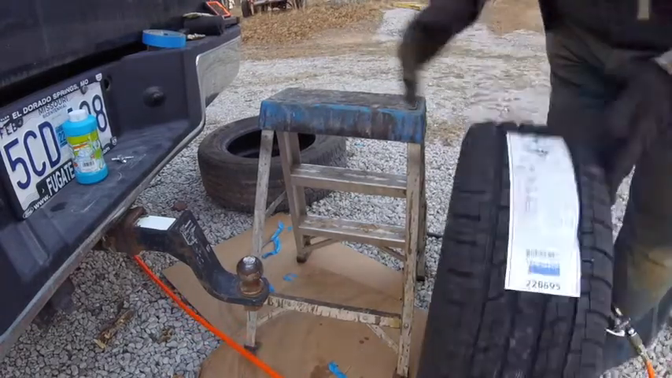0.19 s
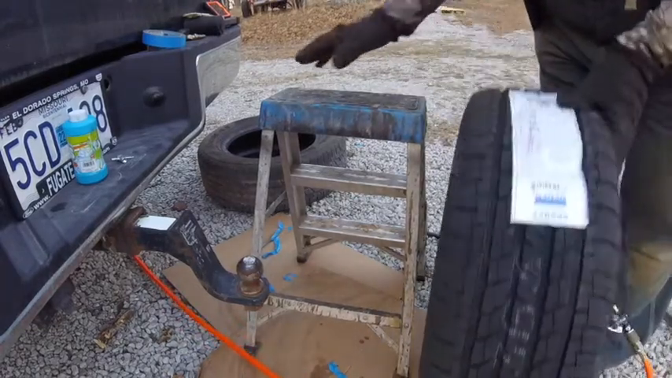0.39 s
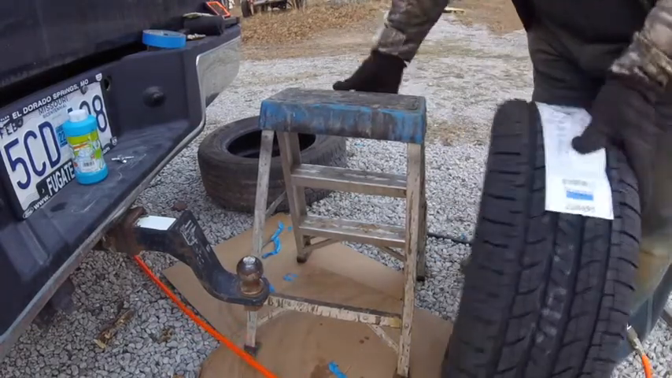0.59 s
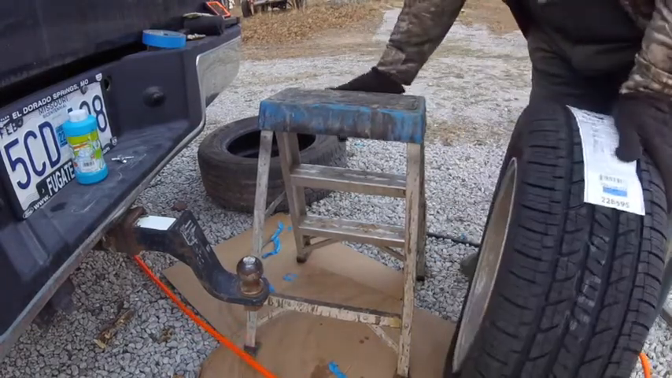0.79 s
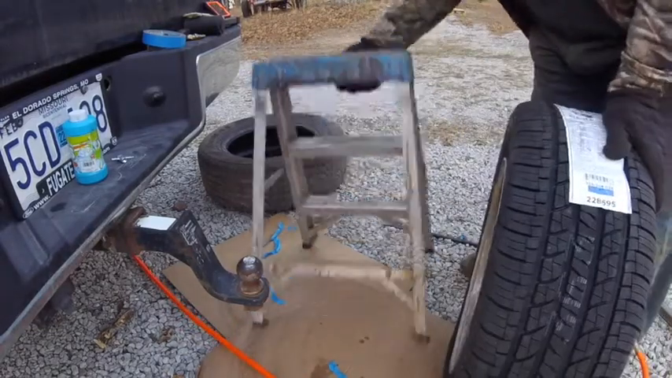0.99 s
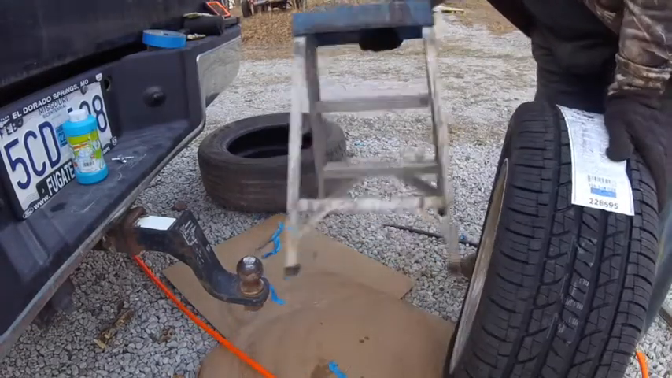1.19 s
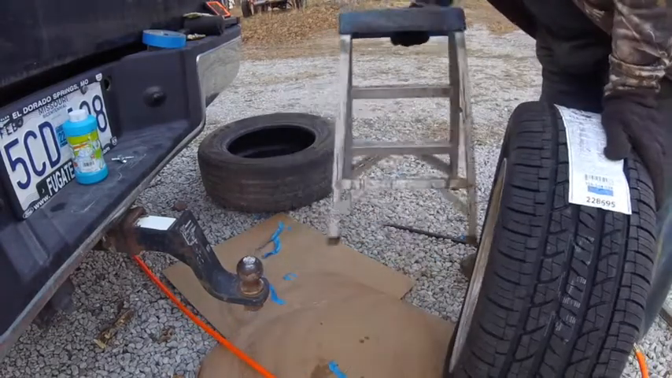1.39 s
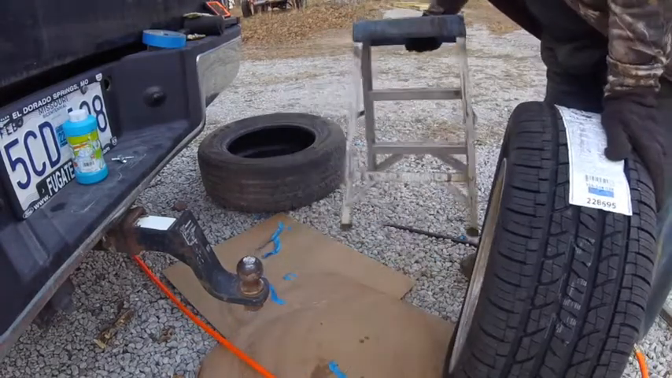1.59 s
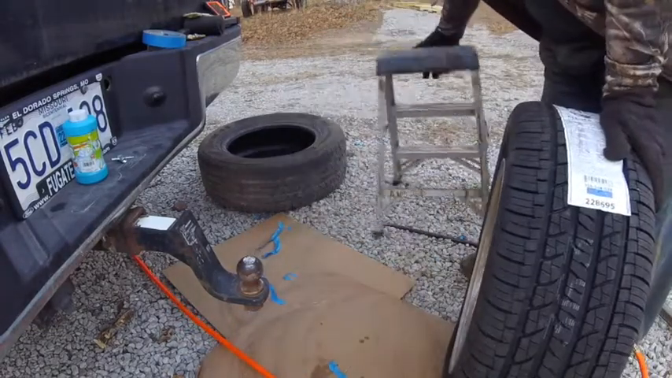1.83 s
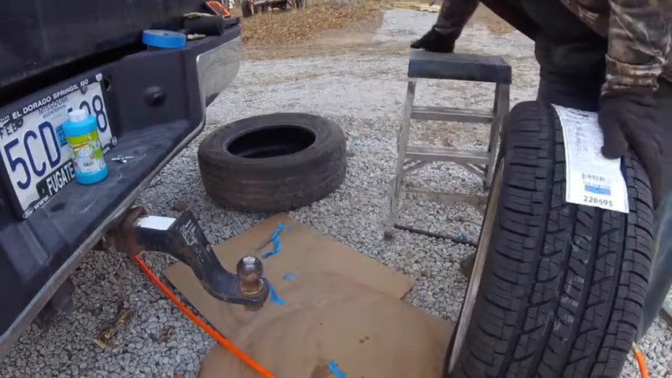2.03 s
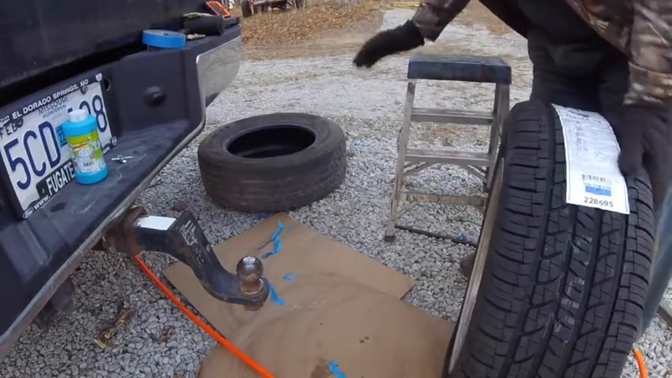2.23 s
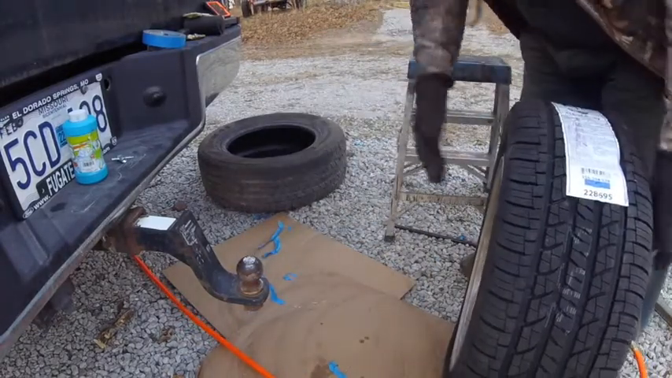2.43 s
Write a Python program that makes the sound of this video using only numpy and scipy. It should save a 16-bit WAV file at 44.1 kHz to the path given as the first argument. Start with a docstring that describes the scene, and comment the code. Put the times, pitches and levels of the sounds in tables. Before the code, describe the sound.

Close outdoor sound: a dull, booming tire drop on gravel with a weaker second bounce, faint handling bumps and clicks, then a sharp, gritty rattle of a small aluminium ladder being set down.

```python
"""A quiet yard with gravel underfoot, heard from close by: a mounted tire drops, bounces twice, rocks to rest.
A small aluminium stepladder is gripped and lifted, knocks once in the air and is set down on the stones,
where its feet scrape and clatter. Tire and frame ring as damped modes; gravel, scuffs and clatter are
dense random grains shaped by envelopes and filters. Filtered noise makes the low rumble and faint hiss
underneath, and a decaying noise tail adds the yard's weak reflections."""
import sys
import numpy as np
from scipy import signal
from scipy.fft import rfft, irfft, next_fast_len
from scipy.io import wavfile

SR = 44100
rng = np.random.default_rng(int(sys.argv[2]) if len(sys.argv) > 2 else 0)


def transcribe(u):
    """Save the signal u as a 16-bit wav file named by the first command-line argument.

    u: samples, shape (n,) or (channels, n), limited to [-1, 1]; the rate is SR.
    q: integer samples, one column per channel.
    """
    v = np.clip(np.atleast_2d(u).T, -1, 1)
    q = np.round(v * 32767).astype(np.int16)
    wavfile.write(sys.argv[1], SR, q)


N = 110250  # samples, 2.5 s


def amp(db):
    """Decibels to linear gain."""
    return 10 ** (np.asarray(db) / 20)


def unit(x):
    """Scale to rms 1."""
    return x / np.sqrt(np.mean(x ** 2) + 1e-20)


def since(start_s):
    """Seconds elapsed since start_s, zero before it."""
    return np.maximum(np.arange(N) / SR - start_s, 0)


def white_noise():
    """Gaussian noise, equally strong at all frequencies."""
    return rng.standard_normal(N)


def colour(x, points):
    """Minimum-phase filter of unit mean power; only the relative levels of the points matter."""
    size = 2 * next_fast_len(N // 2 + 8192)
    hz, level_db = np.transpose(points)
    bins_hz = np.fft.rfftfreq(size, 1 / SR)
    curve_db = np.interp(np.log(bins_hz + 1), np.log(hz + 1), level_db)
    gain = unit(amp(curve_db))
    # folding the cepstrum forward in time makes the filter causal
    cepstrum = irfft(np.log(np.maximum(gain, 1e-6)))
    cepstrum[1:size // 2] *= 2
    cepstrum[size // 2 + 1:] = 0
    response = np.exp(rfft(cepstrum))
    return irfft(rfft(x, size) * response)[:N]


def burst(start_s, rise_s, t60_s):
    """Envelope with a straight rise, then an exponential fall of 60 dB in t60_s."""
    t = since(start_s)
    rise = np.minimum(t / rise_s, 1)
    fall = np.exp(-np.log(1000) * np.maximum(t - rise_s, 0) / t60_s)
    return rise * fall


def grains():
    """Dense tiny contacts at random moments, of uneven size and random sign, rms 1."""
    grains_per_s, spread_db = 9000, 7
    hit = rng.random(N) < grains_per_s / SR
    sign = np.sign(white_noise())
    size = amp(spread_db * np.clip(white_noise(), -2, 2))
    return unit(hit * sign * size)


def ring(modes, start_s, rise_s):
    """Damped sine modes struck at start_s, rising with time constant rise_s, cut off after half a second."""
    t = np.arange(SR // 2) / SR
    hz, level_db, t60_s = np.transpose(modes)[:, :, None]
    decay = np.exp(-np.log(1000) * t / t60_s)
    tone = (amp(level_db) * decay * np.sin(2 * np.pi * hz * t)).sum(0)
    tone *= 1 - np.exp(-t / rise_s)
    return np.pad(tone, (round(start_s * SR), N))[:N]


# gravel crunch muffled under the rubber: pitch_hz, level_db (relative)
UNDER_RUBBER = [(150, -12.5), (600, 0), (2000, -3.5), (3000, -5), (4200, -7.5), (5200, -2), (6500, -3),
                (7300, -10.5), (9500, -21.5), (12000, -42.5)]
# what the tread slap rings with: pitch_hz, level_db, t60_s
TREAD_MODES = [(167.4, 1, 0.034), (440.7, -0.5, 0.045), (469, -15, 0.075), (973, -1.5, 0.023),
               (1732, -1, 0.015), (2033, -5, 0.012), (2580, -13, 0.023)]
SLAP_S, SLAP_DB = .2048, -9.5
CRACK_DB, CRACK_T60_S = -31, 0.026


def tread_slap():
    """The tread slaps down hard: its rubber rings briefly and the gravel under it cracks."""
    slap = amp(SLAP_DB) * ring(TREAD_MODES, SLAP_S, rise_s=0.0023)
    crack = amp(CRACK_DB) * burst(SLAP_S, 0.0012, CRACK_T60_S) * grains()
    return slap + colour(crack, UNDER_RUBBER)


# tire landings and the lurches that follow:
# start_s, thud_db, cavity_db, scuff_db, gravel_db, rise_s, t60_s (rise and decay of scuff and gravel)
TIRE_LANDINGS = [(0.203, -27, -27.5, -29.5, -39.5, 0.0018, 0.15),
                 (0.224, -43, -48, -47, -38.5, 0.004, 0.05),
                 (0.278, -38, -37.5, -40.5, -50.5, 0.0033, 0.11),
                 (0.452, -31, -26.5, -39, -50.5, 0.003, 0.18), (0.604, -50, -46.5, -52.5, -70, 0.015, 0.19)]
# rubber casing of the tire: pitch_hz, level_db, t60_s
CASING_MODES = [(66, -14.5, 0.4), (101.05, -6, 0.62), (116, -6, 0.27), (150, -8.5, 0.12)]
# air inside the tire, and the wheel: pitch_hz, level_db, t60_s
CAVITY_MODES = [(189, -11.5, 0.105), (222, -4.5, 0.24), (246.2, -6.5, 0.26)]
# dull shudder of the rubber after a landing: pitch_hz, level_db (relative)
SHUDDER_COLOUR = [(20, -24), (60, -0.5), (120, 10), (240, 2.5), (300, -19), (600, -56.5), (4000, -120)]
# rubber scuffing: pitch_hz, level_db (relative)
SCUFF_COLOUR = [(100, -16), (310, -16.5), (410, 3), (550, -4.5), (950, -9.5), (1400, -17), (2000, -15.5),
                (3200, -31.5), (8000, -53.5), (14000, -85)]
CASING_RISE_S = 0.006
# shudder level is relative to the thud
SHUDDER_DB, SHUDDER_RISE_S, SHUDDER_T60_S = -4, 0.033, 0.14


def tire_landings():
    """Each landing booms in the casing and its air, shudders, scuffs the tread and presses the gravel."""
    boom, shudder, scuff, crunch = np.zeros((4, N))
    for start_s, thud_db, cavity_db, scuff_db, gravel_db, rise_s, t60_s in TIRE_LANDINGS:
        boom += amp(thud_db) * ring(CASING_MODES, start_s, CASING_RISE_S)
        boom += amp(cavity_db) * ring(CAVITY_MODES, start_s, CASING_RISE_S)
        shudder += amp(thud_db + SHUDDER_DB) * burst(start_s, SHUDDER_RISE_S, SHUDDER_T60_S)
        press = burst(start_s, rise_s, t60_s)
        scuff += amp(scuff_db) * press
        crunch += amp(gravel_db) * press
    shudder *= unit(colour(white_noise(), SHUDDER_COLOUR))
    scuff = colour(scuff * grains(), SCUFF_COLOUR)
    crunch = colour(crunch * grains(), UNDER_RUBBER)
    return boom + shudder + scuff + crunch


# the tire rocking on the ground, level joined by straight lines in dB: time_s, level_db
ROCKING_LEVEL = [(.15, -94), (.19, -43), (0.296, -37), (.34, -48), (.56, -47.5), (.67, -47.5), (.77, -57),
                 (0.999, -52.5), (1.15, -62.5), (2.5, -61.5)]
# low tone colour of the rocking: pitch_hz, level_db (relative)
ROCKING_COLOUR = [(15, -8.5), (28, 2), (45, -2), (100, -5.5), (150, -16.5), (300, -26.5), (900, -53.5),
                  (6000, -120)]


def tire_rocking():
    """The tire rocks to rest as a low rumble of filtered noise that swells and sinks."""
    level_db = np.interp(since(0), *np.transpose(ROCKING_LEVEL))
    return amp(level_db) * unit(colour(white_noise(), ROCKING_COLOUR))


# stones shifting under the weight: start_s, level_db, rise_s, t60_s
STONE_SHIFTS = [(0.076, -64.5, 0.023, 0.46), (0.385, -60, 0.0019, 0.016), (0.529, -61.5, 0.017, 0.32),
                (0.851, -56, 0.01, 0.38), (2.246, -61, 0.058, 0.28), (2.427, -62, 0.017, 0.16)]


def stones():
    """Short crunches of gravel shifting under the weight."""
    shifts = sum(amp(level_db) * burst(start_s, rise_s, t60_s)
                 for start_s, level_db, rise_s, t60_s in STONE_SHIFTS)
    return colour(shifts * grains(), UNDER_RUBBER)


# blows and scrapes of the ladder, top_hz being the top of the contact's band:
# start_s, clatter_db (before CLATTER_DB), grit_db, rise_s, t60_s (of the clatter), top_hz
LADDER_BLOWS = [(0.912, -46, -47, 0.0052, 0.093, 2160), (.943, -49.5, -48.5, 0.0023, 0.047, 2000),
                (1.405, -40, -48, 0.0059, 0.062, 3260), (1.8434, -34, -26.5, 0.0077, 0.1, 5040),
                (1.8537, -30.5, -30.5, 0.0021, 0.074, 6100), (1.863, -34.5, -25.5, 0.013, 0.018, 5000),
                (1.8765, -21, -30.5, 0.0025, 0.026, 4460), (1.897, -38, -65, 0.01, .09, 2300),
                (1.921, -42, -48, 0.0032, 0.26, 2500), (1.953, -30, -40, 0.015, 0.037, 2280),
                (1.9675, -20, -34.5, 0.00081, 0.059, 2080), (1.975, -33, -54, 0.0053, 0.17, 1900),
                (2.002, -32, -43.5, 0.0015, .075, 2380), (2.041, -43, -67, 0.023, 0.1, 1970),
                (2.0909, -36.5, -42.5, 0.0023, 0.14, 2400), (2.146, -45.5, -58.5, .014, 0.24, 1520),
                (2.176, -42.5, -57, 0.0061, 0.065, 3180)]
# rattling joints: pitch_hz, level_db (relative)
CLATTER_COLOUR = [(80, -19.5), (180, -6), (300, -8.5), (410, 4), (560, -4.5), (850, -2.5), (1350, 1),
                  (2300, -4), (3000, -6), (6000, -6.5), (12000, -46)]
# grit ground under the feet: pitch_hz, level_db (relative)
GRIT_COLOUR = [(50, -42), (200, -11), (1500, -9.5), (2800, -7.5), (4200, -13.5), (5200, -2), (6500, -6),
               (7200, -15.5), (9500, -25), (14000, -53)]
CLATTER_DB = -0.5


def ladder_blows():
    """Each blow is a rush of small contacts, low-passed to its own band, and a shorter grind of grit."""
    clatter, grit = np.zeros((2, N))
    for start_s, clatter_db, grit_db, rise_s, t60_s, top_hz in LADDER_BLOWS:
        contacts = amp(clatter_db) * burst(start_s, rise_s, t60_s) * grains()
        clatter += signal.lfilter(*signal.butter(2, top_hz, fs=SR), contacts)
        grit += amp(grit_db) * burst(start_s, rise_s, 0.82 * t60_s)
    clatter = amp(CLATTER_DB) * colour(clatter, CLATTER_COLOUR)
    return clatter + colour(grit * grains(), GRIT_COLOUR)


# hard strikes on the frame: start_s, level_db, top_hz (above it the modes are struck more weakly)
FRAME_STRIKES = [(1.8618, -35, 1510), (1.876, -28, 5000), (1.969, -34, 1680), (2.005, -38.5, 1500),
                 (2.055, -45.5, 1590), (2.094, -43, 2000), (2.181, -50, 3040)]
# the ladder's frame, before the random shifts: pitch_hz, level_db
FRAME_MODES = [(408, -3), (740, -3.5), (905, -6), (948, -6), (1143, 2.5), (1276, 0.5), (1393, -4),
               (2218, -2), (2846, -3)]
# decay of the lowest mode, and the exponent that shortens higher ones
FRAME_T60_S, FRAME_DAMPING = .105, .15
# random spread from strike to strike: pitch as a share, level in dB
FRAME_DETUNE, FRAME_SCATTER_DB = .006, 2


def ladder_frame():
    """Hard strikes ring the frame; high modes die sooner, and pitch and level vary randomly per strike."""
    hz, mode_db = np.transpose(FRAME_MODES)
    t60_s = FRAME_T60_S * (hz[0] / hz) ** FRAME_DAMPING
    out = np.zeros(N)
    for start_s, strike_db, top_hz in FRAME_STRIKES:
        shift, scatter = rng.standard_normal((2, len(hz)))
        pitches_hz = hz * (1 + FRAME_DETUNE * shift)
        contact_loss_db = 20 * np.log10(np.hypot(1, (hz / top_hz) ** 2))
        levels_db = mode_db + FRAME_SCATTER_DB * scatter - contact_loss_db
        modes = np.transpose([pitches_hz, levels_db, t60_s])
        out += amp(strike_db) * ring(modes, start_s, rise_s=0.0016)
    return out


# soft bumps of the ladder against the hand: start_s, level_db
HAND_BUMPS = [(0.918, -45), (0.948, -43.5), (1.402, -45), (1.854, -48.5)]
# what a bump rings with: pitch_hz, level_db, t60_s
BUMP_MODES = [(139, 3, 0.11), (179.4, -0.5, 0.13)]
# dull rubbing of glove and rubber feet: start_s, level_db, rise_s, t60_s
GLOVE_RUBS = [(0.883, -48.5, 0.052, 0.067), (1.421, -52, 0.013, 0.15)]


def handling():
    """The ladder bumps in a gloved hand as low damped modes, and rubs as dull grains."""
    rub = sum(amp(level_db) * burst(start_s, rise_s, t60_s)
              for start_s, level_db, rise_s, t60_s in GLOVE_RUBS)
    bumps = sum(amp(level_db) * ring(BUMP_MODES, start_s, rise_s=0.0014)
                for start_s, level_db in HAND_BUMPS)
    return colour(rub * grains(), SCUFF_COLOUR) + bumps


# sharp ticks of ladder joints and pinched stones: start_s, level_db, low_cut_hz
JOINT_TICKS = [(0.6595, -44, 4950), (0.7681, -37.5, 1400), (0.866, -39.5, 910), (0.8813, -35, 875),
               (0.9127, -31.5, 4520), (0.921, -30.5, 4600), (0.925, -40, 2520), (0.9267, -26.5, 4640),
               (1.846, -17, 7300), (1.8556, -6, 7600), (2.147, -36.5, 6570)]
# tone colour shared by the ticks: pitch_hz, level_db (relative)
TICK_COLOUR = [(200, 13), (2200, 5.5), (4200, -2), (5300, 4.5), (6600, -4.5), (8000, -5.5), (10000, -21.5),
               (14000, -41.5)]
# snap and chatter levels are relative to the tick; the times shape the chatter
SNAP_DB, CHATTER_DB, TICK_RISE_S, TICK_T60_S = 14.5, -4, 0.0003, 0.017


def ticks():
    """Tiny snaps, each with a brief chatter; the smaller the part, the less bass it has."""
    out = np.zeros(N)
    for start_s, level_db, low_cut_hz in JOINT_TICKS:
        snap = amp(SNAP_DB) * signal.unit_impulse(N, round(start_s * SR))
        chatter = amp(CHATTER_DB) * burst(start_s, TICK_RISE_S, TICK_T60_S) * grains()
        high_pass = signal.butter(2, low_cut_hz, "high", fs=SR)
        out += signal.lfilter(*high_pass, amp(level_db) * (snap + chatter))
    return colour(out, TICK_COLOUR)


YARD_DB, YARD_DELAY_S, YARD_T60_S = -20, 0.012, 0.29


def yard_reflections(near):
    """Weak, short reflections from the things standing around: a delayed, decaying noise tail."""
    tail = (white_noise() * burst(YARD_DELAY_S, 0.0019, YARD_T60_S))[:SR // 2]
    tail /= np.linalg.norm(tail)
    return amp(YARD_DB) * signal.fftconvolve(near, tail)[:N]


# low outdoor rumble: pitch_hz, level_db (per Hz, relative)
RUMBLE_COLOUR = [(20, -8.5), (58, -12.5), (90, 1), (150, -21), (220, -19), (500, -26.5), (2900, -36.5),
                 (4300, -45), (6700, -38), (9000, -47), (14000, -47)]
# thin hiss: pitch_hz, level_db (relative)
HISS_COLOUR = [(4500, -36.5), (6000, -20.5), (6500, 1), (7100, -8), (9000, -12.5), (14000, -32)]
RUMBLE_DB, HISS_DB = -58.5, -72.5


def background():
    """Low outdoor rumble and a thin steady hiss, both filtered noise."""
    rumble = amp(RUMBLE_DB) * unit(colour(white_noise(), RUMBLE_COLOUR))
    return rumble + amp(HISS_DB) * colour(white_noise(), HISS_COLOUR)


def scene():
    """Tire, stones and ladder close by in the open yard, in one channel."""
    tire = tread_slap() + tire_landings() + tire_rocking()
    ladder = ladder_blows() + ladder_frame() + handling()
    near = tire + stones() + ladder + ticks()
    return (near + yard_reflections(near) + background())[None]


def record(dry):
    """The recorder's band limit: a steep low-pass, 80 dB down beyond its edge."""
    top_hz = 14300
    low_pass = signal.ellip(10, .1, 80, top_hz, fs=SR, output="sos")
    return signal.sosfilt(low_pass, dry)


dry = scene()
out = record(dry)
transcribe(out)
```